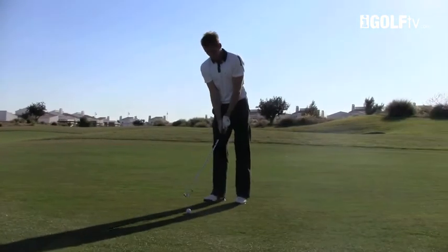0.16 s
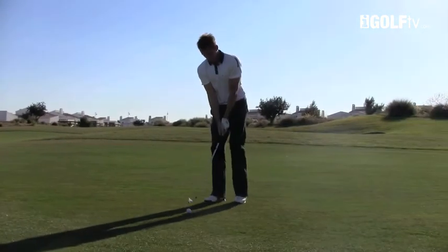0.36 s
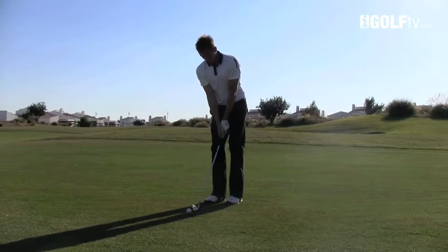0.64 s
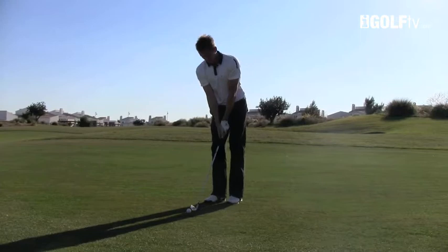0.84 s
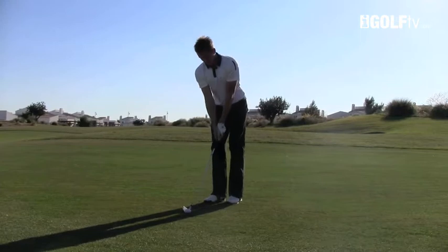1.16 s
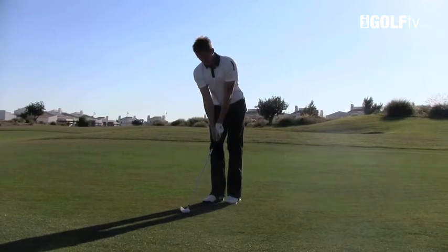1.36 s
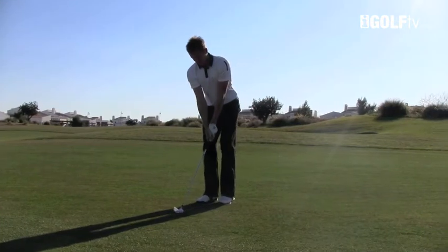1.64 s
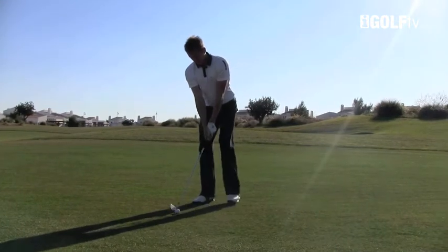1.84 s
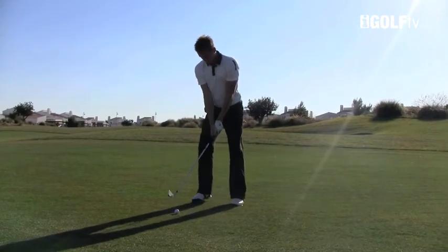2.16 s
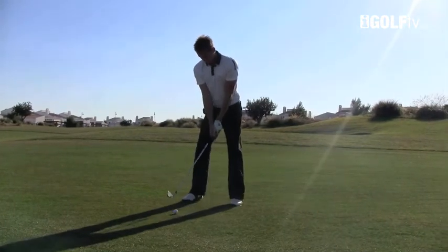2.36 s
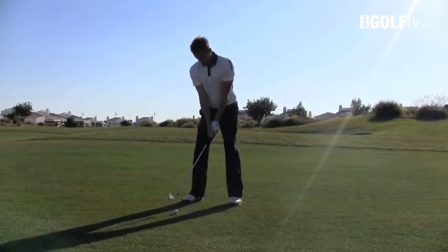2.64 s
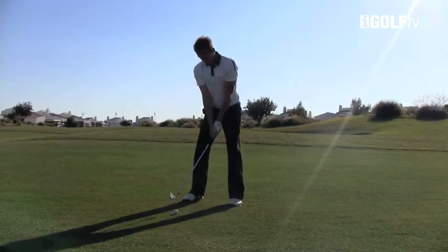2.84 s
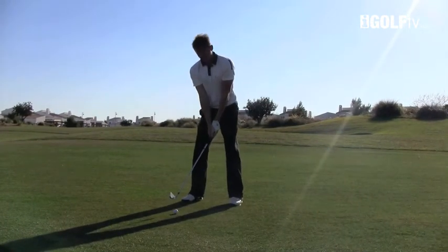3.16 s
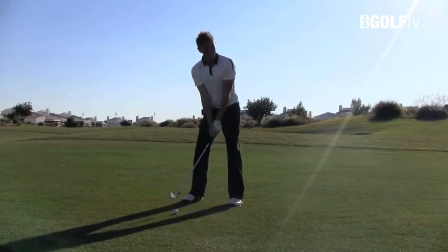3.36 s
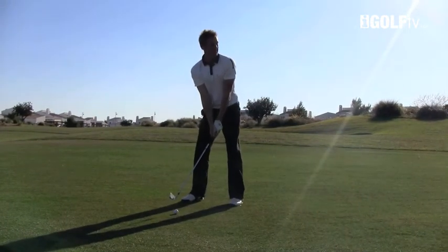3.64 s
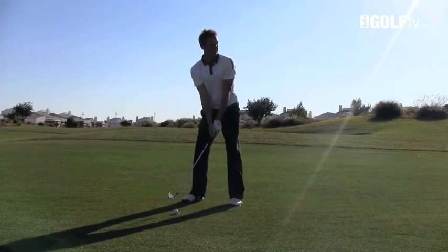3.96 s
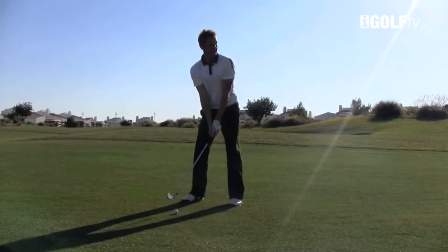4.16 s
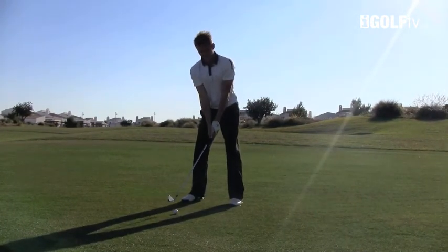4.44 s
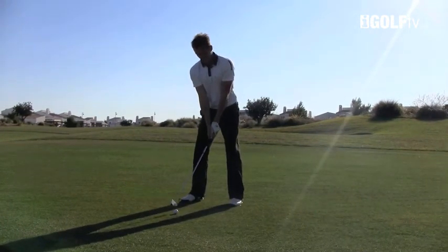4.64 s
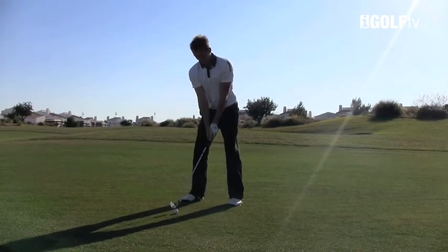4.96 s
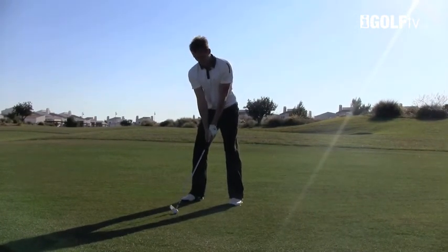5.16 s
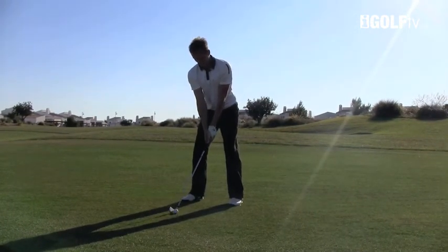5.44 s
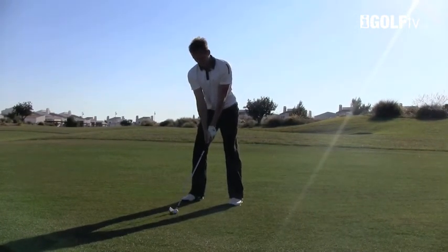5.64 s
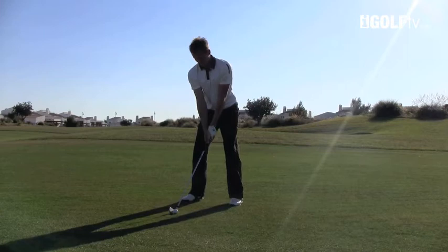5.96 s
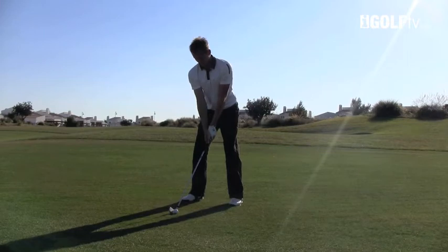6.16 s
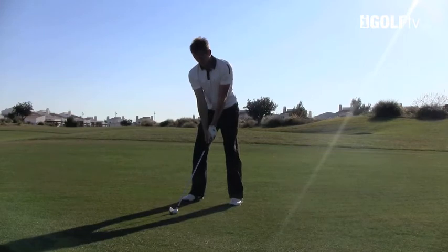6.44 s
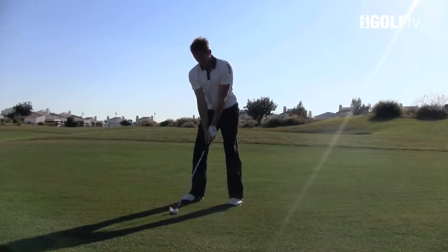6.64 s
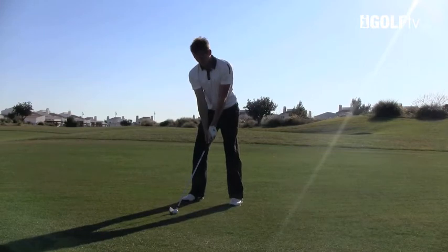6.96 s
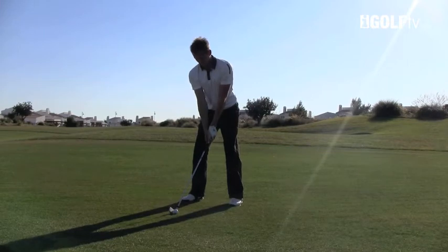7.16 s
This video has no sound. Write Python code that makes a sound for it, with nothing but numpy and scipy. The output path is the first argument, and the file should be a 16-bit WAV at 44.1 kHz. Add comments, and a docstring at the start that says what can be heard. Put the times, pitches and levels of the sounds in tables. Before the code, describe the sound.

Gusty wind rumbles on the microphone while a golfer's clothes rustle and shoes scuff the turf, with faint distant birds.

```python
"""Golfer on a windy fairway

A golfer settles into his stance on open ground, a few metres from the microphone. Gusts buffet the
microphone: large eddies rumble and small ones ride on their peaks, over a steady hiss. Clothes rustle
as he shifts his weight, and shoes and club brush and tap the turf. Far off, a small bird whistles,
and later come three faint, hoarse calls."""
import sys
import numpy as np
from scipy import signal
from scipy.fft import rfft, irfft
from scipy.io import wavfile
from scipy.ndimage import uniform_filter1d

SR = 44100
rng = np.random.default_rng(int(sys.argv[2]) if len(sys.argv) > 2 else 0)


def persist_wave(psi):
    """Save psi, clipped to +-1, as 16-bit WAV."""
    counts = np.round(np.clip(psi, -1, 1) * 32767).astype(np.int16)
    wavfile.write(sys.argv[1], SR, np.atleast_2d(counts).T)


N = 322371
TIME = np.arange(N) / SR


def undb(db):
    """Decibels to gain."""
    return 10 ** (np.asarray(db) / 20)


def unit(x):
    """Scale to rms 1."""
    return x / np.sqrt(np.mean(x ** 2))


def colour(x, spectrum):
    """Filter by a curve of (frequency [Hz], gain [dB]) points."""
    hz, db = np.transpose(spectrum)
    size = 2 ** 19
    bin_hz = np.maximum(np.fft.rfftfreq(size, 1 / SR), 1)
    gain = undb(np.interp(np.log(bin_hz), np.log(hz), db))
    return irfft(rfft(x, size) * gain)[:N]


def noise(spectrum):
    """Noise of rms 1 with the given spectrum."""
    return unit(colour(rng.standard_normal(N), spectrum))


def wander(rate_hz):
    """Smooth random drift of rms 1."""
    hold = int(SR / rate_hz)
    steps = np.repeat(rng.standard_normal(N // hold + 1), hold)
    return unit(uniform_filter1d(uniform_filter1d(steps, hold), hold)[:N])


def swell(centre, length):
    """A smooth rise and fall, reaching zero one length either side of the centre."""
    return np.cos(np.pi * np.clip((TIME - centre) / (2 * length), -0.5, 0.5)) ** 4


def friction(spectrum, grain_db):
    """Many tiny slips of uneven size, coloured by the rubbing surfaces."""
    slips = rng.standard_normal(N) * undb(grain_db * wander(500))
    return unit(colour(slips, spectrum))


def eddies(spectrum, span_s):
    """Turbulent pressure, evened out over span_s so that the wind's strength sets its level."""
    pressure = noise(spectrum)
    span = int(span_s * SR)
    power = uniform_filter1d(uniform_filter1d(pressure ** 2, span), span)
    return pressure / np.sqrt(power)


def taps(hits, contact_s, grit):
    """Each contact builds up, then dies in one heavily damped ring; grit mixes in noise."""
    out = np.zeros(N)
    t = np.arange(SR // 10) / SR
    for start_s, peak_db, hz, t60 in hits:
        envelope = (1 - np.exp(-t / contact_s)) * undb(-60 * t / t60)
        ring = envelope * (np.sin(2 * np.pi * hz * t) + grit * rng.standard_normal(len(t)))
        start = int(start_s * SR)
        out[start:start + len(t)] += undb(peak_db) * ring / np.abs(ring).max()
    return out


def air():
    """Open air and microphone hiss, centred in the bass and wide in the treble, with a trace of whine."""
    # spectrum of the hiss: (frequency [Hz], relative level [dB])
    hiss = [(100, -3), (400, 1.5), (600, -1.5), (780, 0), (1200, -3.5), (2000, -5.5), (3200, -7.5),
            (6400, -10.5), (10000, -13.5), (15500, -18)]
    # stereo width of the hiss: (frequency [Hz], side minus mid [dB])
    width = [(100, -33.5), (500, -10.5), (1200, -13.5), (2500, -12), (5000, -8), (8000, -5.5),
             (15000, -2.5)]
    # thin electrical whine: (frequency [Hz], rms level [dB])
    tones = [(6725, -87), (15622, -88)]
    mid = noise(hiss) * undb(0.13 * wander(3.44))
    side = colour(noise(hiss), width)
    whine = sum(np.sqrt(2) * undb(db) * np.sin(2 * np.pi * hz * TIME) for hz, db in tones)
    return undb(-58.5) * np.array([mid + side, mid - side]) + whine


def wind_strength():
    """Gusts add their power to the breeze; returns the strength of the large and of the small eddies."""
    # breeze between the gusts: (time [s], relative rumble level [dB])
    breeze = [(0.0, -40.5), (0.26, -31), (0.61, -45.5), (1.1, -38), (2.2, -38.5), (2.48, -39),
              (3.81, -34.5), (4.15, -42), (5.82, -37.5), (7.31, -35.5)]
    # gusts: (peak time [s], length [s], relative rumble level [dB], offset for small eddies [dB])
    gusts = [(0.303, 0.18, -33, -3), (0.893, 0.3, -38, -18), (1.613, 0.65, -39.5, -2),
             (2.503, 0.34, -27.5, -4.5), (2.72, 0.19, -37, 2), (3.107, 0.36, -33, 0.5),
             (3.65, 0.68, -41, -9), (4.475, 0.11, -37.5, -4.5), (5.01, 0.81, -36, -6),
             (5.446, 0.098, -33, -8.5), (5.792, 0.23, -27, -9.5), (6, .12, -30.5, -9),
             (6.495, 0.53, -33.5, -1.5)]
    rise_share = 0.38  # a gust builds faster than it dies away
    breeze_db = np.interp(TIME, *np.transpose(breeze)) - 0.5
    large_power, small_power = undb(breeze_db) ** 2, undb(breeze_db - 5) ** 2
    for peak_s, length, db, small_db in gusts:
        t = (TIME - peak_s) / length
        spread = np.where(t < 0, rise_share, 1 - rise_share)
        push = undb(db) * np.exp(-(t / spread) ** 2)
        large_power += push ** 2
        small_power += (push * undb(small_db)) ** 2
    wavering = undb(1.5 * wander(9))
    return np.sqrt([large_power, small_power]) * wavering


def wind():
    """Wind on the microphone: large eddies rumble, small ones ride their peaks, strong gusts flutter."""
    # large slow eddies: (frequency [Hz], relative level [dB])
    rumble_spectrum = [(12, -3.5), (22, -5.5), (36, 2), (70, 1), (100, -7), (140, -21), (230, -28),
                       (500, -58), (3000, -110)]
    # small fast eddies: (frequency [Hz], relative level [dB])
    buffet_spectrum = [(50, -14), (90, 2.5), (125, 1.5), (160, -3.5), (200, -8), (280, -19), (400, -33.5),
                       (650, -46.5), (1200, -55), (5000, -100)]
    # fine turbulence stirred up by strong gusts: (frequency [Hz], relative level [dB])
    flutter_spectrum = [(120, -2.5), (230, 2), (330, 1.5), (480, -6.5), (700, -16.5), (1200, -26.5),
                        (5000, -75)]
    large_strength, small_strength = wind_strength()
    large = eddies(rumble_spectrum, span_s=0.53)
    peaks = unit(np.sqrt(1 + 0.45 * large ** 2))
    rumble = large * large_strength
    buffet = eddies(buffet_spectrum, span_s=0.1) * peaks * small_strength
    force = np.sqrt(large_strength * small_strength)
    growth = 1.226  # dB of flutter per dB of gust
    flutter = noise(flutter_spectrum) * peaks * (force / force.max()) ** growth
    return undb(-0.5) * rumble + undb(-1.5) * buffet + undb(-46.5) * flutter


def clothes():
    """Cloth rubs with each shift of weight, over a light fidgeting that fades as the golfer settles."""
    # rustling cloth: (frequency [Hz], relative level [dB])
    cloth = [(200, -9), (500, 5.5), (820, 5.5), (1400, -5), (3000, -12.5), (6200, -12.5), (9000, -22.5),
             (15000, -17)]
    # shifts of weight: (centre time [s], length [s], level [dB])
    shifts = [(0.176, .35, -57), (0.59, .6, -60.5), (1.11, 0.57, -57), (2.246, 1.4, -58.5),
              (3.452, 1.0, -61.5)]
    settle_db_per_s = 2
    fidget = undb(-61 - settle_db_per_s * TIME)
    shift_power = sum((undb(db) * swell(centre, length)) ** 2 for centre, length, db in shifts)
    return friction(cloth, grain_db=2.0) * np.sqrt(fidget ** 2 + shift_power)


def ticks():
    """A quick cluster of small, crisp contacts, each with a gritty ring."""
    # ticks: (time [s], peak level [dB], pitch [Hz], 60 dB decay time [s])
    hits = [(.0188, -37, 5500, 0.0097), (.0225, -39.5, 4900, 0.016), (.027, -43, 4320, 0.019),
            (.0294, -31, 4300, 0.0023), (.0321, -46, 4950, .005), (.0331, -29.5, 5800, 0.00083)]
    return taps(hits, contact_s=0.0001, grit=0.49)


def turf_scuffs():
    """Shoes and club head brush the turf: a dull rub of the sole and a swish of grass blades."""
    # brushes on the turf: (centre time [s], length [s], sole level [dB], grass level [dB])
    scuffs = [(0.601, 0.048, -50.5, -77), (1.104, 0.38, -67, -68), (1.972, 0.031, -60.5, -55.5),
              (1.998, 0.04, -60, -59.5), (2.054, 0.057, -52.5, -62), (2.423, 0.027, -51, -75),
              (2.614, 0.062, -55, -64.5), (2.849, 0.02, -51, -74), (3.03, 0.04, -54, -72.5)]
    # sole on turf: (frequency [Hz], relative level [dB])
    sole_spectrum = [(200, -6), (420, 8), (750, 7), (1200, -1), (1800, -11), (5000, -40)]
    # grass blades: (frequency [Hz], relative level [dB])
    grass_spectrum = [(1200, -12), (2600, -0.5), (3800, 1.5), (6200, -3), (8500, -11), (15000, -39)]
    sole = friction(sole_spectrum, grain_db=4.0)
    grass = friction(grass_spectrum, grain_db=0.5)
    out = np.zeros(N)
    for centre, length, sole_db, grass_db in scuffs:
        out += swell(centre, length) * (undb(sole_db) * sole + undb(grass_db) * grass)
    return out


def small_bird():
    """A small bird far from the microphone whistles three thin, warbling notes."""
    # whistled notes: (start time [s], length [s], pitch [Hz], level [dB])
    notes = [(.715, 0.065, 3050, -66.5), (.96, .08, 3200, -71), (1.052, 0.079, 3600, -62.5)]
    warble_hz, warble_depth, edge_s = 28, 0.019, 0.0071
    out = np.zeros(N)
    for start_s, length, hz, db in notes:
        t = TIME - start_s
        envelope = undb(db) * np.clip(np.minimum(t, length - t) / edge_s, 0, 1)
        warble = warble_depth * np.sin(2 * np.pi * warble_hz * t)
        pitch = hz * (1 + warble + 0.0052 * wander(200))
        out += np.sqrt(2) * envelope * np.sin(2 * np.pi * np.cumsum(pitch) / SR)
    return out


def turf_knocks():
    """Shoes and club tap the ground, which damps each knock at once."""
    # soft knocks: (time [s], peak level [dB], pitch [Hz], 60 dB decay time [s])
    hits = [(1.9425, -31.5, 720, 0.0066), (2.9526, -37, 1080, 0.002), (3.398, -45, 680, 0.013)]
    return taps(hits, contact_s=0.00044, grit=0.035)


def wind_thumps():
    """Single hard buffets strike the microphone, each a low, damped thump."""
    # buffets: (time [s], peak level [dB], pitch [Hz], 60 dB decay time [s])
    hits = [(2.402, -20, 89, 0.099), (2.487, -28, 162, 0.044), (2.562, -21, 55, 0.018),
            (3.068, -18, 105, 0.029)]
    return taps(hits, contact_s=0.0034, grit=0)


def far_calls():
    """Hoarse bird calls blurred by distance: swells of noise through one throat resonance."""
    # calls: (centre time [s], length [s], pitch [Hz], bandwidth [Hz], level [dB])
    calls = [(4.13, 0.22, 1850, 300, -70), (4.494, 0.34, 1930, 130, -64), (4.91, 0.26, 1900, 400, -65)]
    out = np.zeros(N)
    for centre, length, hz, width_hz, db in calls:
        throat = signal.iirpeak(hz, hz / width_hz, fs=SR)
        rasp = unit(signal.lfilter(*throat, rng.standard_normal(N)))
        out += undb(db) * swell(centre, length) * rasp
    return out


def scene():
    """Open ground gives no echo; everything but the hiss sits in the centre."""
    weather = air() + wind() + wind_thumps()
    golfer = clothes() + turf_scuffs() + turf_knocks() + ticks()
    birds = small_bird() + far_calls()
    return weather + golfer + birds


def record(dry):
    """The recorder cuts the top steeply."""
    top_hz = 15800
    lowpass = signal.ellip(12, 0.1, 80, top_hz, fs=SR, output="sos")
    return signal.sosfilt(lowpass, dry)


dry = scene()
out = record(dry)
persist_wave(out)
```